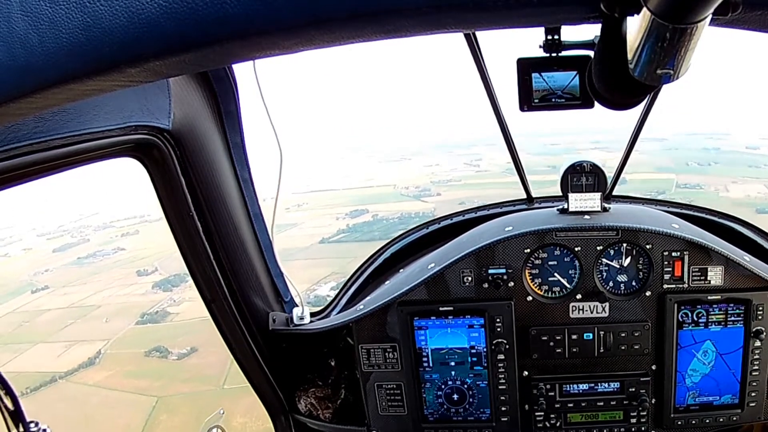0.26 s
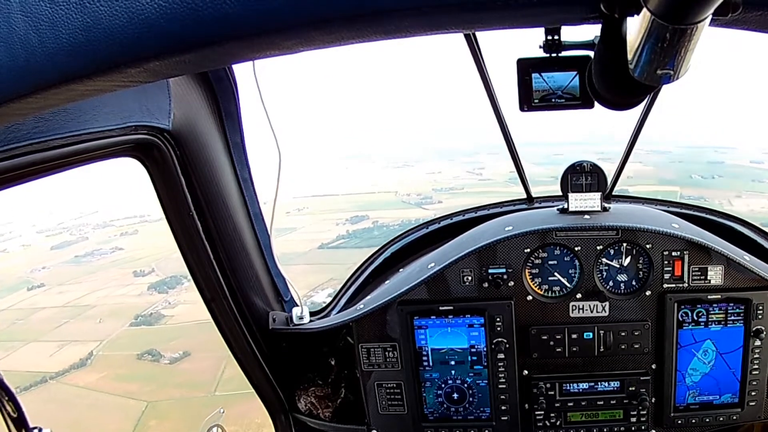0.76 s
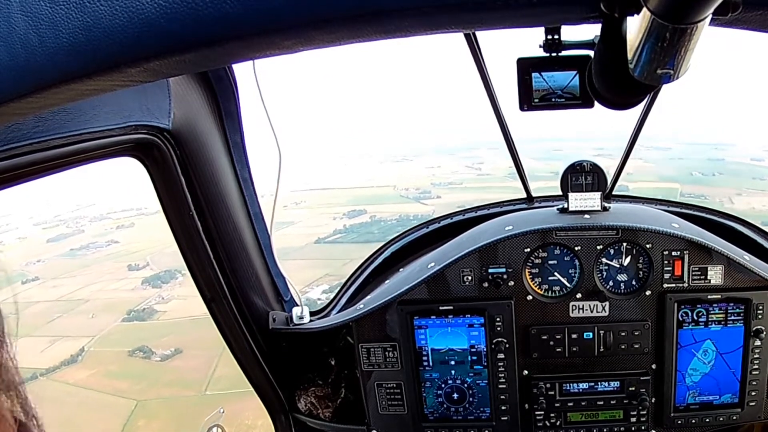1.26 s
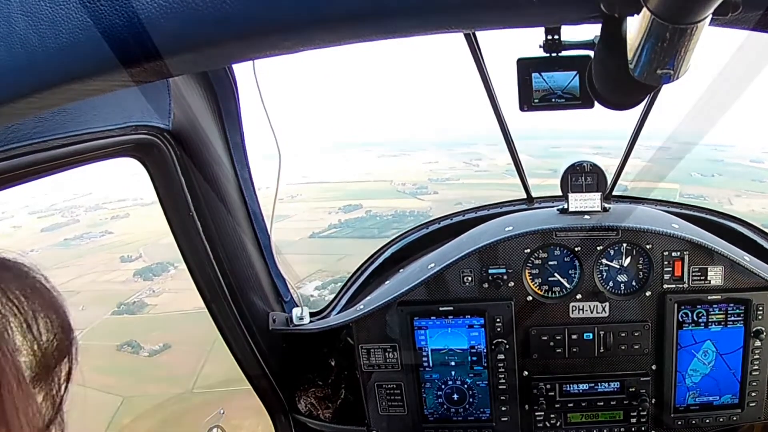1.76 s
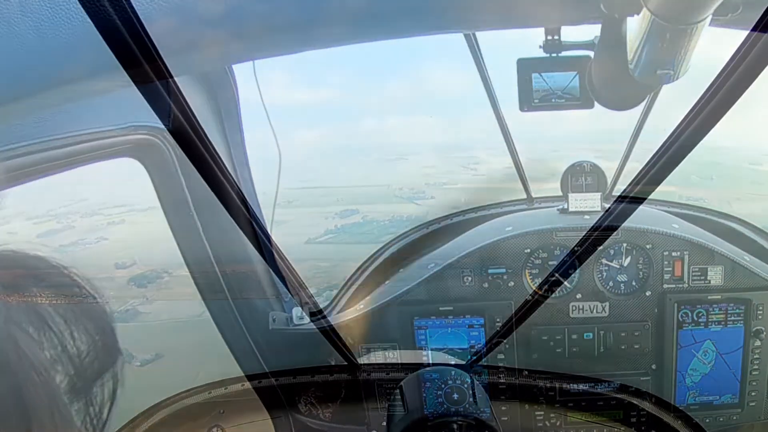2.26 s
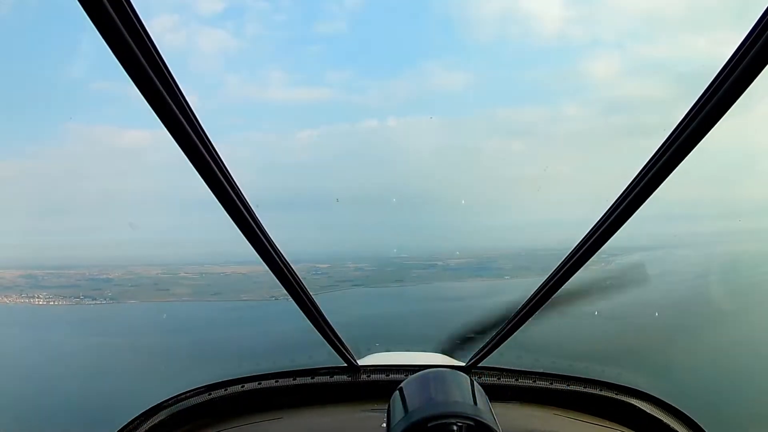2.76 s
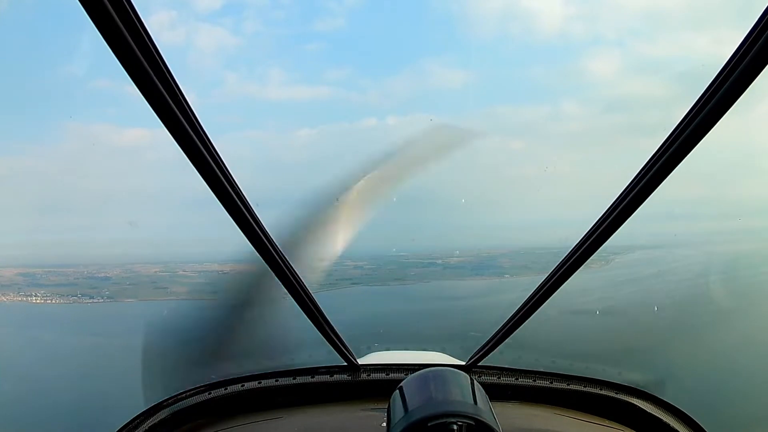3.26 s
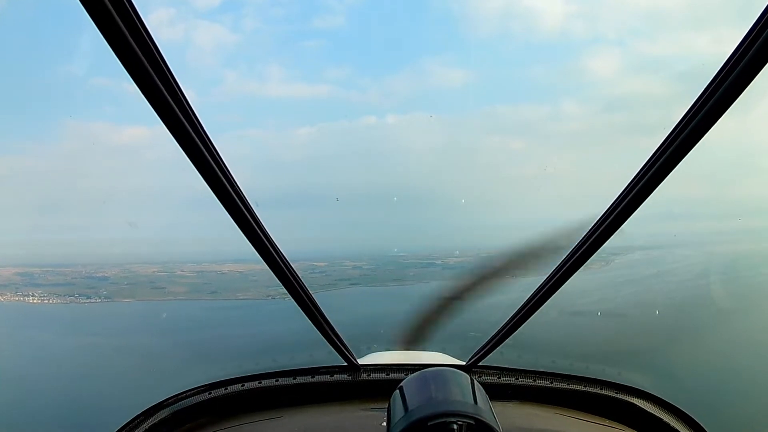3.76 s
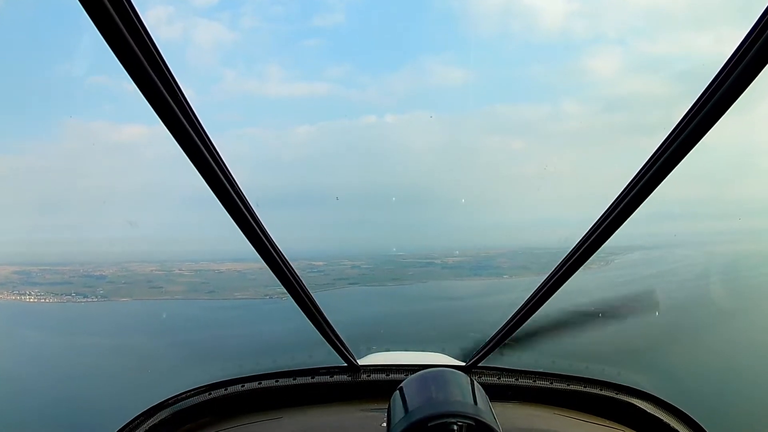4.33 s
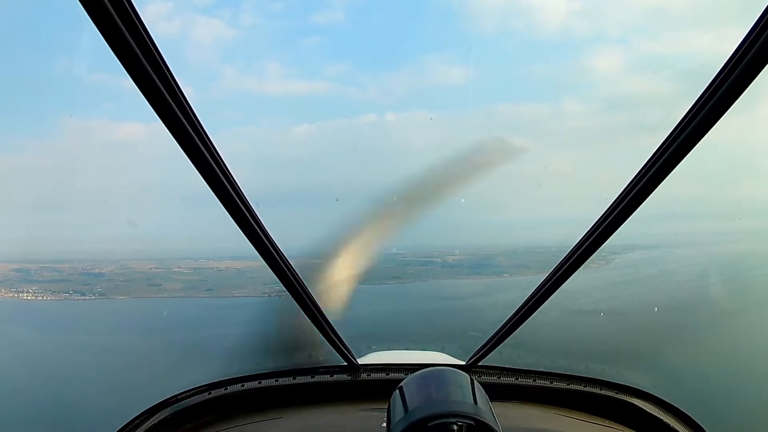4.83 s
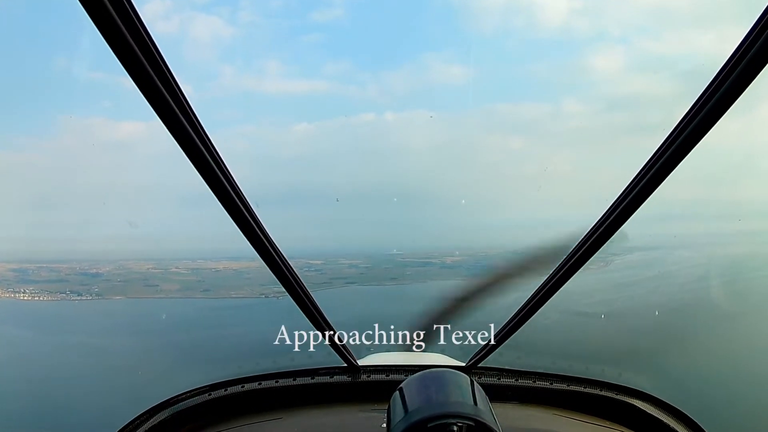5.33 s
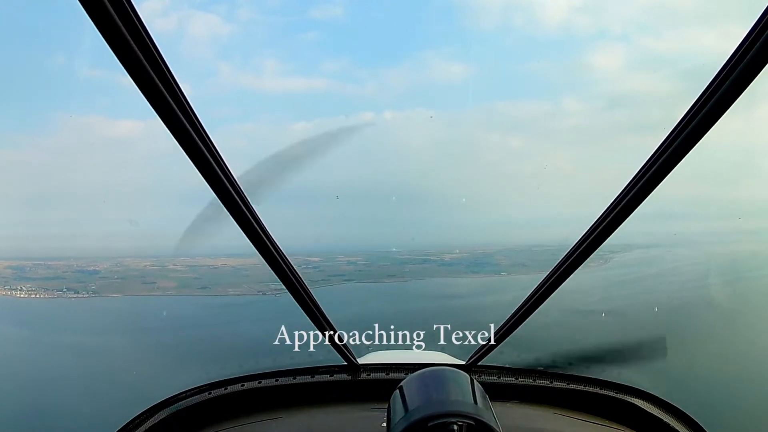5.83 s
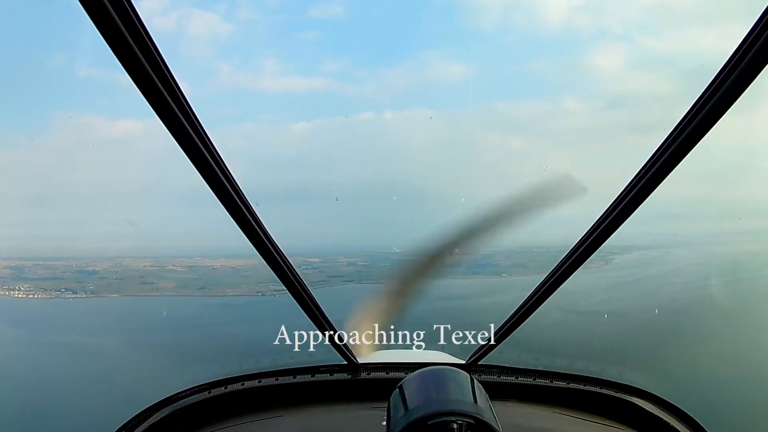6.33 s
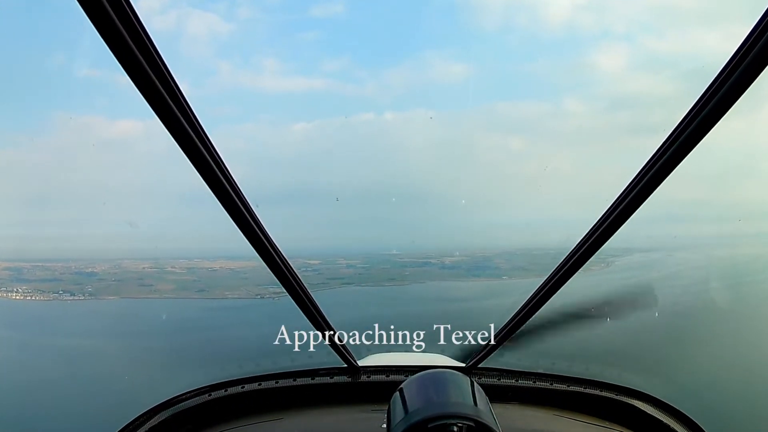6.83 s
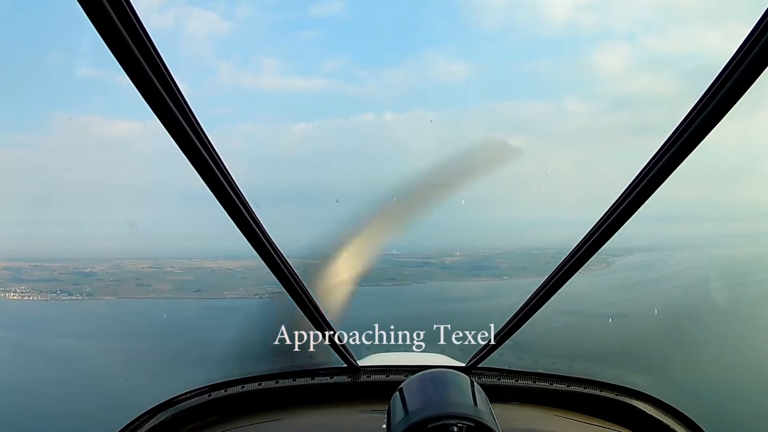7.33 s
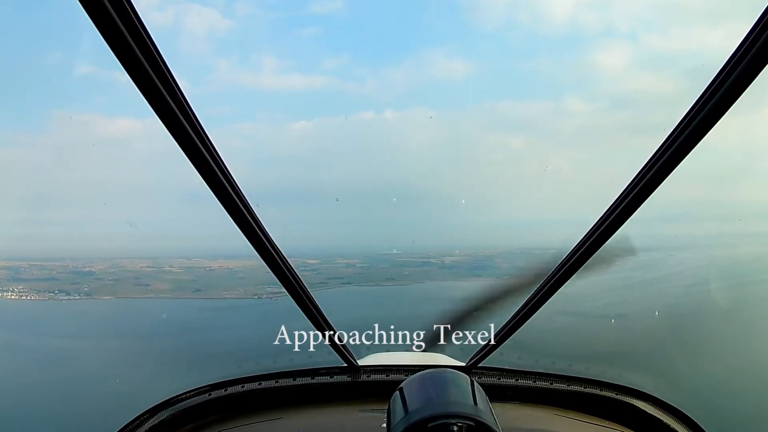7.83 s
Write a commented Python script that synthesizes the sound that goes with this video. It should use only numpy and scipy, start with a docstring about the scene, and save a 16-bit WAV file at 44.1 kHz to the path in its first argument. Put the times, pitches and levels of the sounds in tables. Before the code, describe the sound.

Cockpit interior of a light propeller plane. First, reduced power: soft bassy blade hum, swelling slightly near the start, under muffled airflow and a steady airy whistle. Then an instant jump, without fade, to stronger power: heavy continuous droning, buzzing rasp, quick beating between engine and propeller, and thicker wind. The microphone sits in the cabin, with close, short canopy reflections.

```python
"""A geared flat-four engine, heard inside a light aircraft's cockpit, drives a two-blade propeller.
Engine and propeller are sums of sines locked to their shafts; their orders drone against each other.
Shaped noise gives the rushing air, part of which each passing blade chops; a resonant band whistles.
First the engine runs quietly at reduced power; then the scene jumps to a louder, faster cruise."""
import sys
import numpy as np
from scipy import signal
from scipy.fft import rfft, irfft
from scipy.io import wavfile
from scipy.ndimage import uniform_filter1d, minimum_filter1d

SR = 44100
rng = np.random.default_rng(int(sys.argv[2]) if len(sys.argv) > 2 else 0)


def to_wav(s):
    """Save 16-bit WAV."""
    ch = np.atleast_2d(s).T  # columns
    pcm = np.round(np.clip(ch, -1, 1) * 32767)  # PCM
    wavfile.write(sys.argv[1], SR, pcm.astype(np.int16))


N = 356769
TIME = np.arange(N) / SR
JUMP_S = 1.6757  # when the cruise begins
GEAR = 21 / 51  # propeller turns per crankshaft turn
EASY_CYCLE_HZ, CRUISE_CYCLE_HZ = 40.55, 44.33  # four-stroke cycles per second, before wandering
EASY_LOAD_DB, CRUISE_LOAD_DB = -1.1, 2  # blade loading about which bump and wander act
HUNT_PER_S = 2.5  # how often speed and loading wander about their settings
EASY, CRUISE = 1, 2  # level columns of the engine and propeller tables


def undb(db):
    """Logarithmic level: decibels to amplitude gain."""
    return 10 ** (np.asarray(db) / 20)


def walk(rate):
    """Random modulation: Gaussian low-passed noise that changes about rate times a second; spread 1."""
    hz = np.arange(N // 2 + 1) * SR / N
    lowpass = np.exp(-(hz / rate) ** 2) * (hz > 0)
    drift = irfft(rfft(rng.standard_normal(N)) * lowpass, N)
    return drift / drift.std()


def tone(turns, db):
    """Phase synthesis: a sine that follows a count of turns, at an rms level."""
    return np.sqrt(2) * undb(db) * np.sin(2 * np.pi * turns)


def hiss(spectrum):
    """Spectral shaping: white noise filtered to a density given as (Hz, dB per Hz) points."""
    hz, db = np.transpose(spectrum)
    bins = np.maximum(np.arange(N // 2 + 1) * SR / N, 1)
    gain = undb(np.interp(np.log(bins), np.log(hz), db))
    return irfft(rfft(rng.standard_normal(N)) * gain, N) * np.sqrt(SR / 2)


def orders(turns, multiples, levels, waver_db, steady_db, delays):
    """Order synthesis: tones locked to a shaft, with phase lags adding up; the weak ones waver most."""
    knots = np.linspace(0, N / SR, 64)
    out = 0
    for multiple, db, lag in zip(multiples, levels, np.cumsum(delays)):
        depth = waver_db * np.clip((steady_db - db) / 10, .15, 1)
        waver = depth * np.interp(TIME, knots, rng.standard_normal(len(knots)))
        out = out + tone(multiple * turns - lag, db + waver)
    return out


# Density of the air rushing along the canopy, at reduced power (before a small trim) and at cruise.
# Each row: frequency in Hz, noise density in dB per Hz.
EASY_AIR_SPECTRUM = [(20, -74), (38, -62), (52, -65), (110, -50), (180, -58), (260, -53.5), (350, -60),
                     (540, -59.5), (780, -67), (1250, -67), (2800, -84.5), (4650, -88), (7300, -96.5),
                     (12500, -114)]
CRUISE_AIR_SPECTRUM = [(20, -63.5), (40, -68.5), (55, -59.5), (110, -52), (240, -48.5), (550, -55.5),
                       (900, -55), (1400, -63), (2700, -65), (2950, -72.5), (3500, -75.5), (4400, -71),
                       (6800, -86), (11000, -99), (13500, -112)]


def slipstream(turns, spectrum, chop, flutter_db):
    """Correlated turbulence: successive blades cut the same eddies, so upper hiss repeats at blade rate."""
    air = hiss(spectrum)
    upper_band = signal.butter(2, [1750, 3300], "band", fs=SR, output="sos")
    upper = signal.sosfiltfilt(upper_band, air)
    # two blades: the same eddy recurs half a propeller turn away
    before, after = (np.interp(turns + shift, turns, upper) for shift in (-.5, .5))
    chopped = (upper + chop * (before + after)) / np.sqrt(1 + 2 * chop ** 2)
    rest = air - upper
    return rest * undb(flutter_db * walk(22)) + chopped * undb(flutter_db * walk(22))


def canopy(x, reflect, count=8):
    """Comb filtering: early reflections from the canopy and panel ripple the treble."""
    treble = signal.sosfiltfilt(signal.butter(2, 2600, "high", fs=SR, output="sos"), x)
    lags = (rng.uniform(.001, .012, count) * SR).astype(int)  # 1 to 12 ms
    return x + reflect * sum(np.roll(treble, lag) for lag in lags)


def whistle(hz, width_hz, db, spread_db):
    """Resonance: air through a narrow gap sings in a steady breathy band."""
    b, a = signal.iirpeak(hz, hz / width_hz, fs=SR)  # width of one pass; two passes narrow it
    once = signal.lfilter(b, a, rng.standard_normal(N))
    band = signal.lfilter(b, a, once)
    return band / band.std() * undb(db + spread_db * walk(3.2))


def beating(cycles, turns, sum_db, difference_db):
    """Modulation sidebands: blade wash sweeps over the exhaust and adds a tone either side of the firing."""
    firings, blades = 4 * cycles, 2 * turns
    upper = tone(firings + blades + rng.random(), sum_db + 0.66 * walk(8))
    lower = tone(firings - blades + rng.random(), difference_db + 2.3 * walk(8.7))
    return upper + lower


# A bump in the air changes the blade loading and, if its speed change is not zero, the engine speed.
# Each row: centre in seconds, half-width in seconds, speed change in cycles per second, loading in dB.
EASY_GUST = (.28, .24, 0, 5.2)
CRUISE_GUST = (4.95, .09, -.2, -.9)


def shafts(cycle_hz, bump, unsteady, hunt_hz, wander_db):
    """Geared rotation: integrated speed gives engine cycles and propeller turns; loading change joins them."""
    at_s, width_s, change_hz, change_db = bump
    push = np.exp(-((TIME - at_s) / width_s) ** 2)
    hz = cycle_hz + change_hz * push + hunt_hz * walk(HUNT_PER_S)
    cycles = np.cumsum(hz) / SR + unsteady * walk(11)
    turns = 2 * GEAR * cycles  # two crankshaft turns per four-stroke cycle
    load_db = change_db * push + wander_db * walk(HUNT_PER_S)
    return cycles, turns, load_db


# Propeller orders, with levels before loading and waver.
# Each row: multiple of the propeller shaft speed, level in dB at reduced power, level in dB at cruise.
PROPELLER_ORDERS = [(1, -46, -45), (2, -25, -20), (3, -45, -46), (4, -32, -30), (6, -48, -33),
                    (7, -56, -48), (8, -43, -46), (9, -51, -51), (10, -63, -42), (11, -58, -44),
                    (12, -57, -46), (17, -49, -42)]


def propeller(turns, setting, load_db):
    """Blade-passing tones: unlike blades add weaker tones between; loading acts most on the lowest orders."""
    table = np.array(PROPELLER_ORDERS)
    multiples, levels = table[:, 0], table[:, setting]
    loaded = [db + load_db * min(1, 4 / multiple) for multiple, db in zip(multiples, levels)]
    delays = rng.random(len(multiples))
    return orders(turns, multiples, loaded, waver_db=1.0, steady_db=-23, delays=delays)


# Engine orders in the cockpit, with levels before waver and roughness.
# Each row: multiple of the four-stroke cycle rate, level in dB at reduced power, level in dB at cruise.
ENGINE_ORDERS = [(2, -40, -35), (3, -46, -46), (4, -40, -14.3), (5, -49, -33), (6, -29.6, -24.4),
                 (7, -64, -39), (8, -54, -30.5), (9, -52, -41), (10, -49, -44), (11, -52, -47),
                 (12, -48, -40.5), (13, -53, -35), (14, -49, -39.5), (15, -67, -47), (16, -58, -35),
                 (17, -70, -37), (18, -63, -42), (19, -54, -38), (20, -55, -31.5), (21, -61, -32),
                 (22, -47, -38), (23, -43, -44), (24, -48, -46), (25, -54, -39), (26, -57, -39),
                 (27, -56, -45), (28, -51, -51), (29, -69, -48), (30, -50, -52), (31, -70, -48),
                 (32, -56, -50), (33, -60, -47), (34, -52, -50), (35, -68, -49), (36, -58, -53),
                 (41, -85, -54), (42, -58, -55), (46, -65, -57), (52, -65, -54)]


def engine(cycles, setting, rough, waver_db, steady_db):
    """Firing orders: four unequal firings a cycle give a low drone, and a rasp in uneven bursts."""
    table = np.array(ENGINE_ORDERS)
    multiples, levels = table[:, 0], table[:, setting]
    low = multiples < 14.5
    high = ~low
    drone = orders(cycles, multiples[low], levels[low], waver_db, steady_db, rng.random(low.sum()))
    # neighbouring tones ring the same panel and arrive together; the panels answer over half a cycle
    panels = np.repeat(rng.permutation(np.linspace(0, .5, 7)), 4)[:high.sum()]
    delays = panels + .25 * rng.random(len(panels))
    rasp = orders(cycles, multiples[high], levels[high], waver_db, steady_db, delays)
    return drone + rasp * (1 + rough * walk(60))


def reduced_power():
    """Superposition at low power: a soft, propeller-led hum with a thin engine whine and a whistle of air."""
    cycles, turns, load_db = shafts(EASY_CYCLE_HZ, EASY_GUST, unsteady=.0007, hunt_hz=0.022, wander_db=1.3)
    air = canopy(slipstream(turns, EASY_AIR_SPECTRUM, chop=.05, flutter_db=0.46), reflect=0.076)
    gap = whistle(hz=2270, width_hz=300, db=-45, spread_db=0.1)
    sidebands = beating(cycles, turns, sum_db=-35, difference_db=-44.5)
    blades = propeller(turns, EASY, EASY_LOAD_DB + load_db)
    motor = engine(cycles, EASY, rough=0.066, waver_db=2.5, steady_db=-28.5)
    return undb(-0.6) * air + gap + sidebands + blades + motor


def cruise():
    """Superposition at high power: a loud firing drone, with the exhaust rasp and slipstream well up."""
    cycles, turns, load_db = shafts(CRUISE_CYCLE_HZ, CRUISE_GUST, unsteady=.0006, hunt_hz=.016, wander_db=.25)
    air = canopy(slipstream(turns, CRUISE_AIR_SPECTRUM, chop=0.17, flutter_db=0.27), reflect=0.1)
    sidebands = beating(cycles, turns, sum_db=-25.0, difference_db=-31)
    blades = propeller(turns, CRUISE, CRUISE_LOAD_DB + load_db)
    motor = engine(cycles, CRUISE, rough=0.073, waver_db=1.17, steady_db=-17.5)
    return air + sidebands + blades + motor


def scene():
    """Abrupt succession: reduced power, then straight into the cruise."""
    return np.where(TIME < JUMP_S, reduced_power(), cruise())[None]


def limiter(x, ceiling, size=65):
    """Look-ahead gain control: turns down each crest that would pass the ceiling."""
    gain = ceiling / np.maximum(np.abs(x), ceiling)
    held_gain = minimum_filter1d(gain, 2 * size)
    return x * uniform_filter1d(uniform_filter1d(held_gain, size), size)


def record(dry):
    """Band limiting: notches the treble, limits crests, drops the deepest rumble and cuts the top."""
    notch = signal.iirnotch(7970, 16, fs=SR)  # Hz, quality factor of each of two passes
    notched = signal.lfilter(*notch, signal.lfilter(*notch, dry))
    held = limiter(notched, ceiling=.475)
    lean = signal.sosfilt(signal.butter(1, 3, "high", fs=SR, output="sos"), held)
    top_cut = signal.ellip(8, .2, 70, 15600, fs=SR, output="sos")
    return signal.sosfilt(top_cut, lean)


dry = scene()
out = record(dry)
to_wav(out)
```